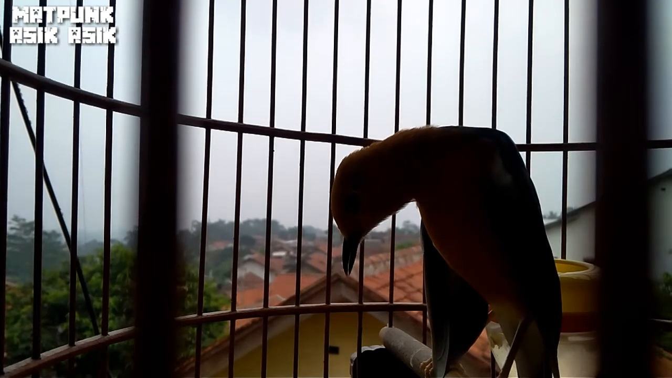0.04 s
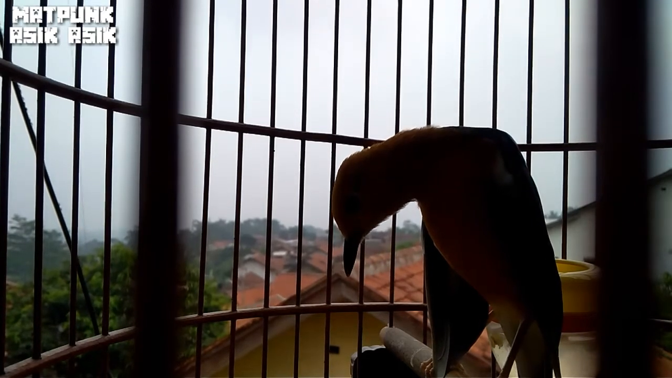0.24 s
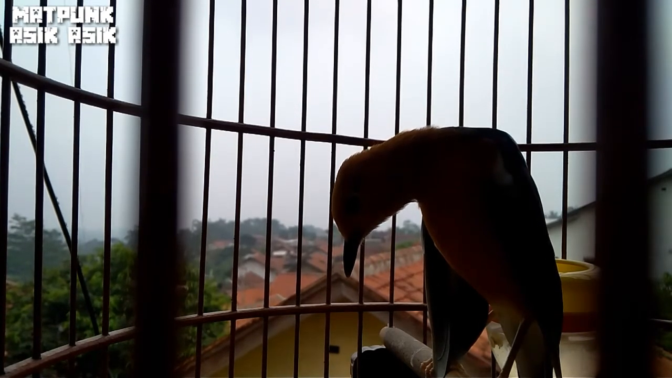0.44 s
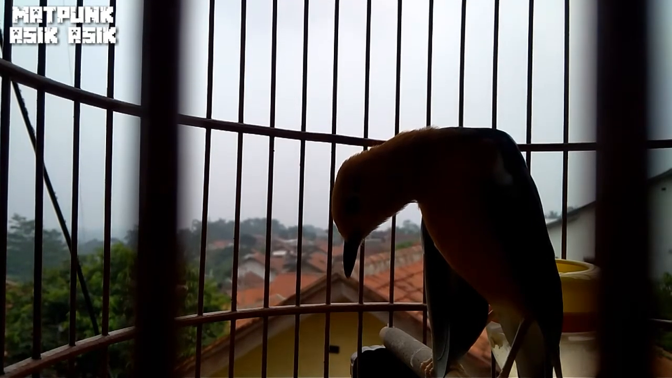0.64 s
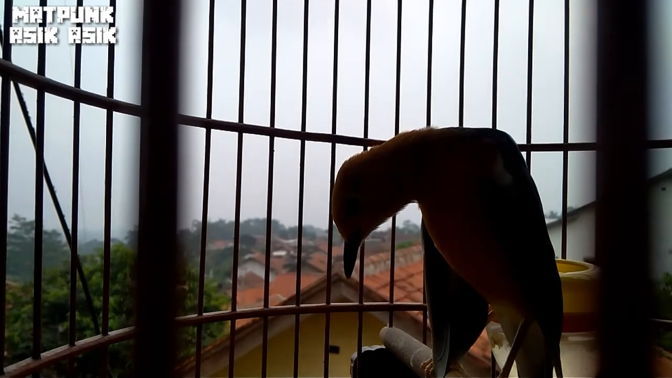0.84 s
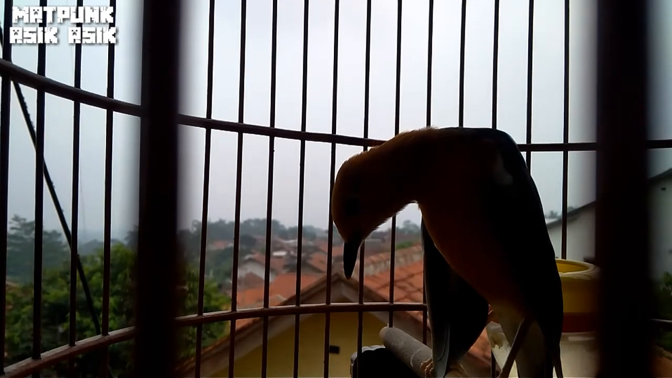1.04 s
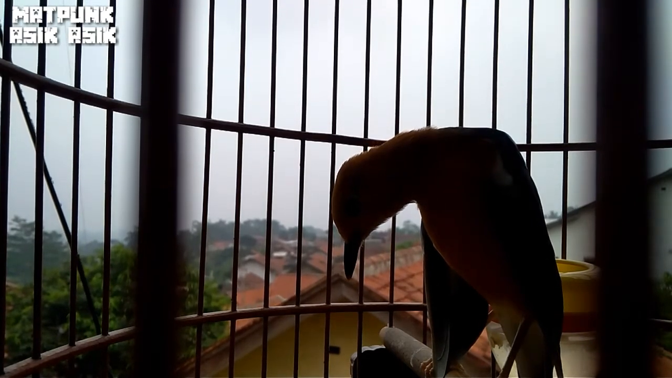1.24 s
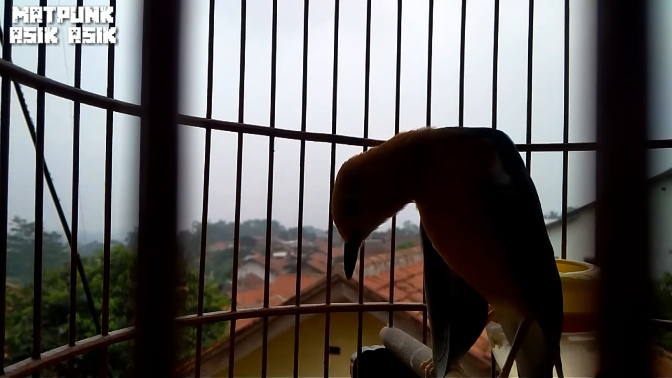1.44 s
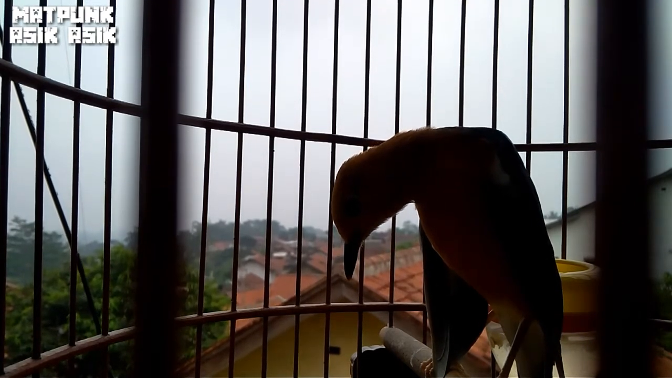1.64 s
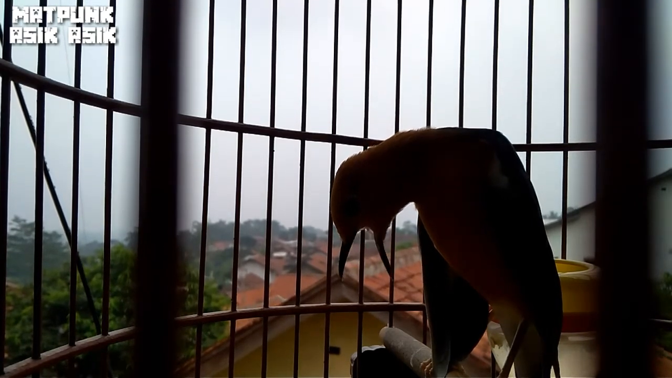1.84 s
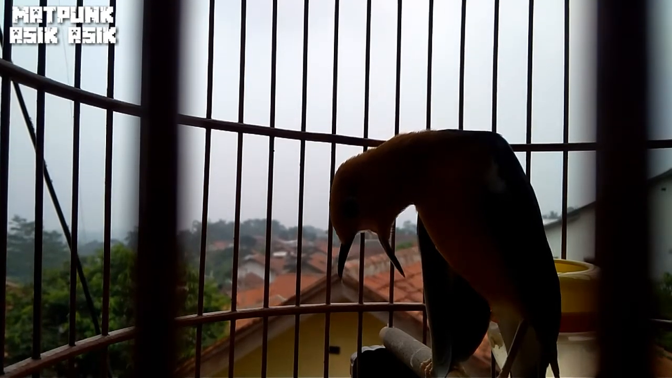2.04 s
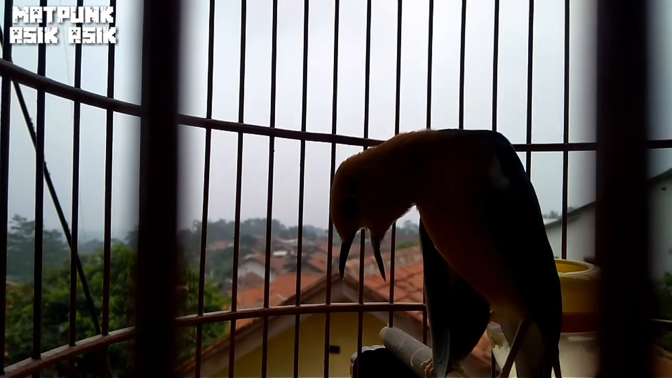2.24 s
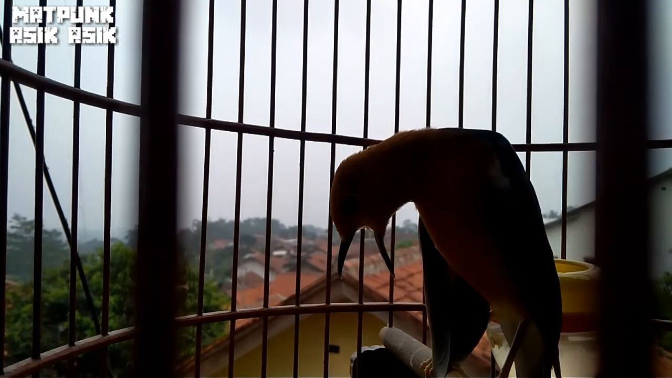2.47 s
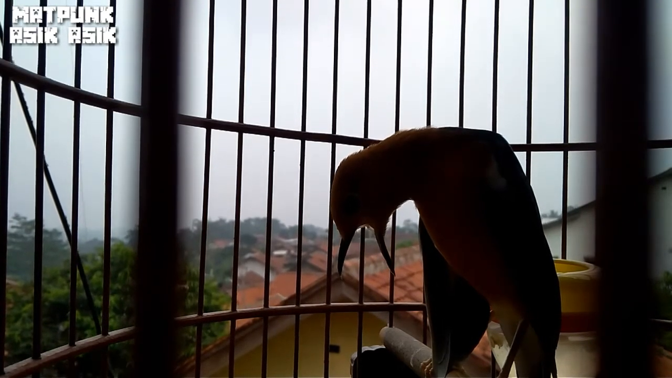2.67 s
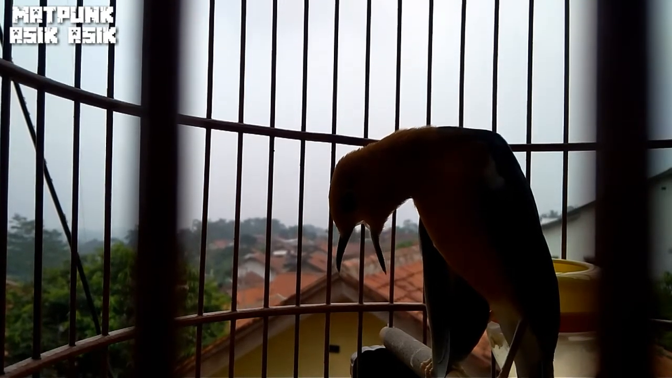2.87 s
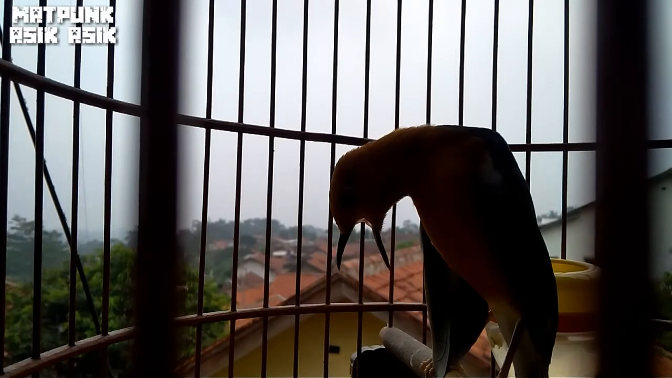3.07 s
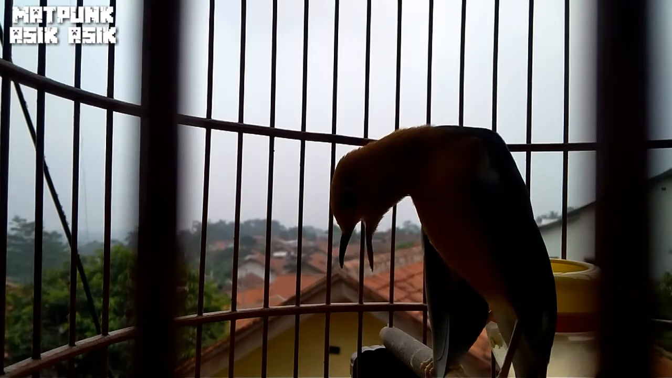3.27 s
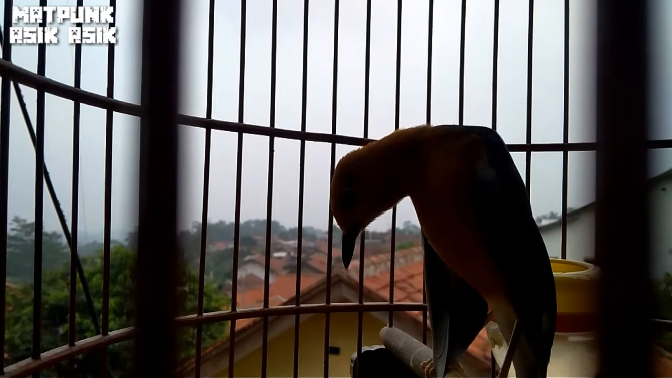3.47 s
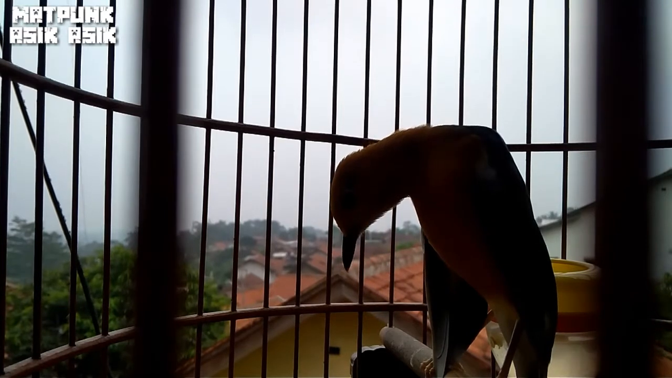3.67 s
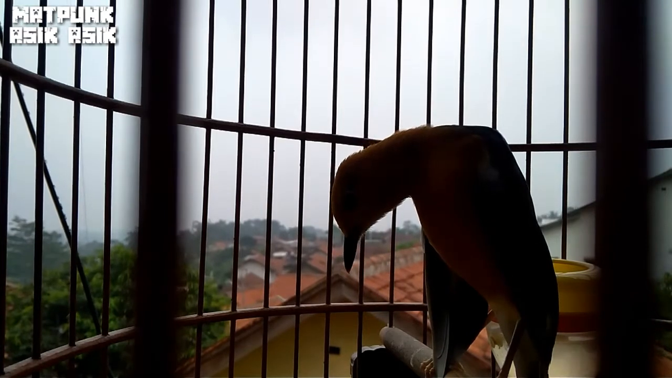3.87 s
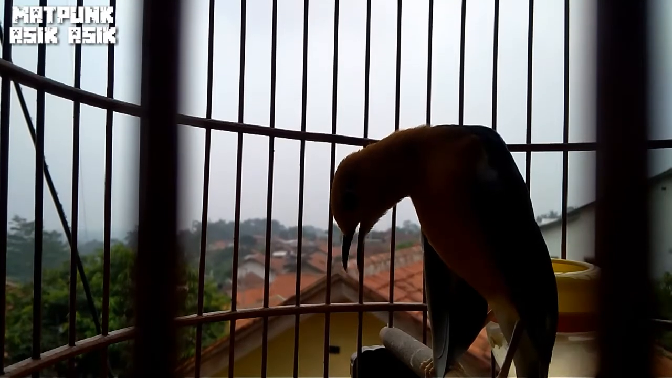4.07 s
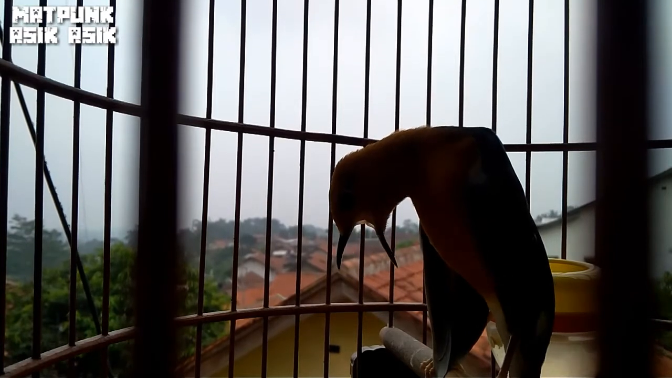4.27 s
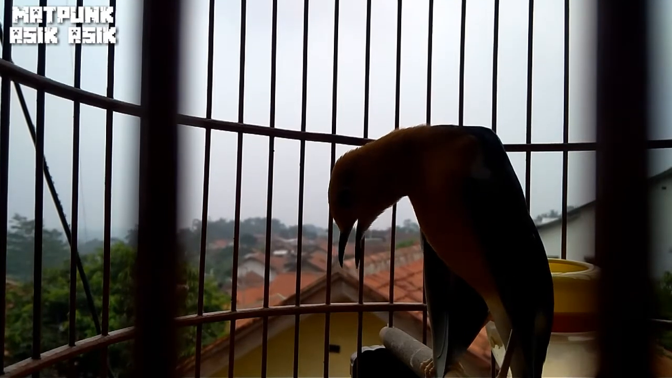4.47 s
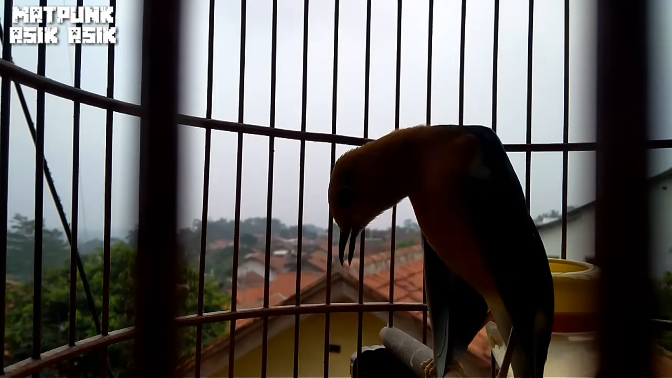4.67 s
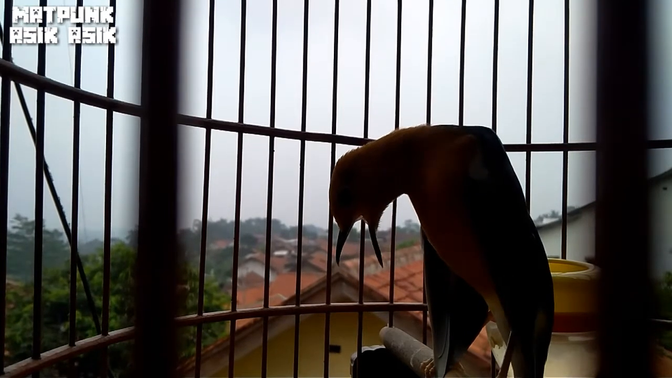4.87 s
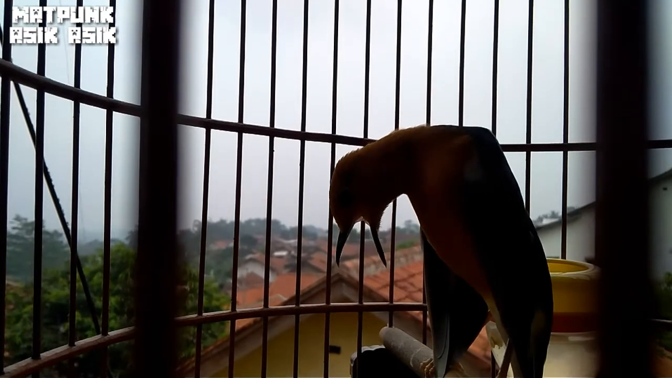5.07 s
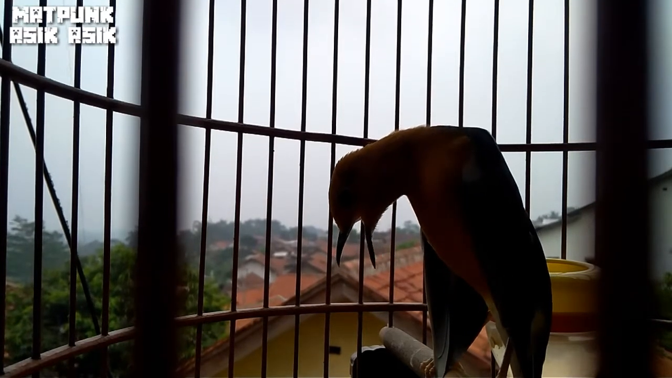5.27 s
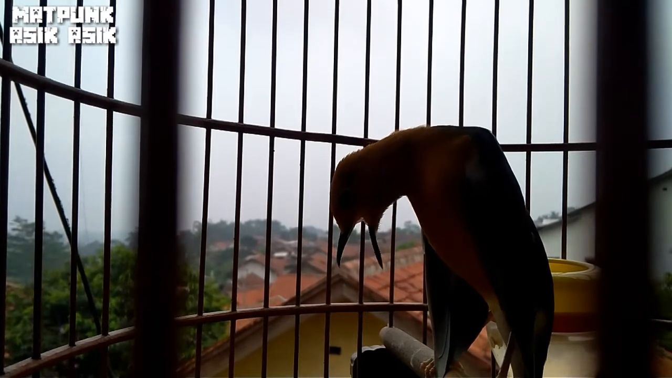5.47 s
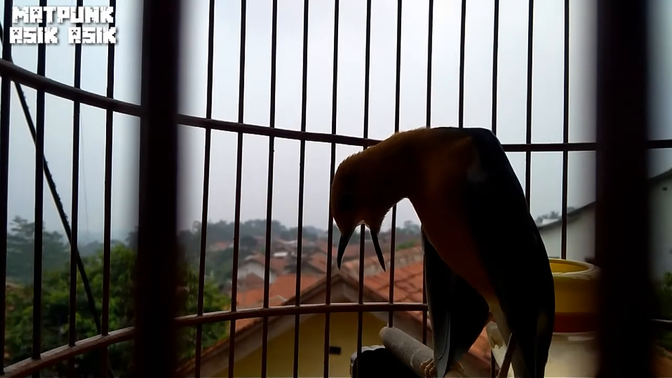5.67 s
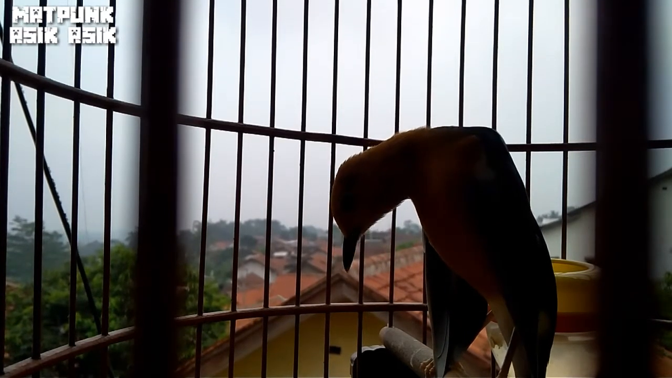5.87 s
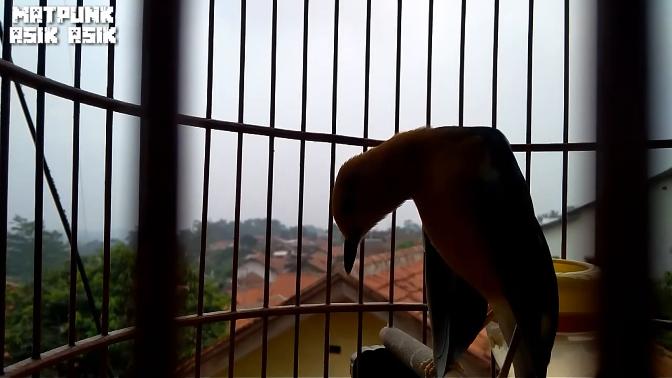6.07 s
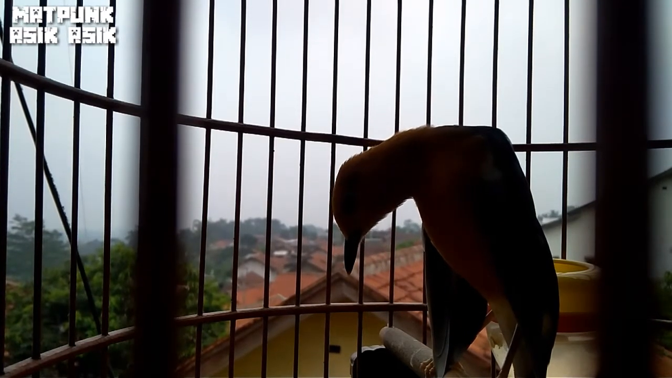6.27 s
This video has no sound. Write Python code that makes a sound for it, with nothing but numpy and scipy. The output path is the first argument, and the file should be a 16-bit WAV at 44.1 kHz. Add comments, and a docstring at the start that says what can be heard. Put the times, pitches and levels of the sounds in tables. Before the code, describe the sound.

A caged songbird very close to the microphone sings two sharp chirps, then twice a piercing two-toned whistle, harsh chack, falling trill and arched slur.

```python
"""On a roofed balcony a caged thrush sings very close to a phone, over wavering town noise and engine tones.
Its two-sided syrinx, as paired harmonic tones with air, gives chirps, then twice the same phrase: a long
two-voiced whistle, a harsh chack, a falling trill and an arched slur. Noise makes the breeze puffs and a knock,
warbling tones the far birds. Cage and balcony add short noise-like reflections; the loudest notes clip."""
import sys
import numpy as np
from scipy import signal
from scipy.fft import rfft, irfft, next_fast_len
from scipy.io import wavfile
from scipy.ndimage import uniform_filter1d, minimum_filter1d

SR = 44100
rng = np.random.default_rng(int(sys.argv[2]) if len(sys.argv) > 2 else 0)


def generate_wav(signal):
    """Clip the signal to [-1, 1] and save it as 16-bit WAV at the path in sys.argv[1]."""
    frames = np.transpose(np.atleast_2d(signal))
    scaled = np.clip(frames, -1, 1) * 32767
    pcm = np.round(scaled).astype(np.int16)
    wavfile.write(sys.argv[1], SR, pcm)


N = 278271
LEAD = SR // 4  # samples before time zero, when the song is already under way
T = np.arange(-LEAD, N) / SR  # s


def undb(db):
    """Decibels to gain."""
    return 10 ** (np.asarray(db) / 20)


def colour(x, points):
    """Shape a sound with a spectrum of (pitch_hz, level_db) points, joined along log frequency."""
    hz, db = np.transpose(points)
    size = next_fast_len(x.shape[-1])
    f = np.maximum(np.fft.rfftfreq(size, 1 / SR), 1)
    gain = undb(np.interp(np.log(f), np.log(hz), db))
    return irfft(rfft(x, size) * gain, size)[..., :x.shape[-1]]


def walk(t, rate):
    """Random wander through `rate` new values a second."""
    knots = np.arange(t[0], t[-1] + 1 / rate, 1 / rate)
    return np.interp(t, knots, rng.standard_normal(len(knots)))


def gate(t, edge):
    """Soft opening and closing of a note, each `edge` seconds long."""
    nearest_end = np.minimum(t - t[0], t[-1] - t)
    return np.sin(np.pi / 2 * np.clip(nearest_end / edge, 0, 1)) ** 2


def tone(hz, second_db, third_db):
    """A whistle with its second and third harmonics, which fade out far up in the treble."""
    phase = 2 * np.pi * np.cumsum(hz) / SR
    whistle = 0
    for k, db in enumerate((0, second_db, third_db), 1):
        treble_fade = np.clip((SR / 2 - k * hz) / (SR / 10), 0, 1)
        whistle = whistle + undb(db) * treble_fade * np.sin(k * phase)
    return whistle


def hiss():
    """Turbulent air in the throat, at unit level."""
    air = colour(rng.standard_normal(len(T)),
                 [(1500, -25), (3000, -30), (6000, 2.5), (9000, -1), (13000, -13), (16000, -22.5)])
    return air / air.std()


def echoes(x, t60, delay):
    """Dense reflections from `delay` s on that fall 60 dB in `t60` s, different at each microphone."""
    t = np.arange(SR) / SR
    response = rng.standard_normal((2, SR)) * np.exp(-np.log(1000) * t / t60) * (t > delay)
    response /= np.sqrt(np.sum(response ** 2, axis=1, keepdims=True))
    return signal.fftconvolve(x[None], response, axes=1)[:, :len(x)]


# Spectral shape of the hum before it is brought to unit level: pitch_hz, relative level_db
HUM_SPECTRUM = [(18, -48), (30, -7), (113, 1), (216, -5), (247, -6.5), (328, -10.5), (597, -22), (680, -22),
                (754, -27.5), (815, -18.5), (5880, -26), (10200, -28), (15000, -48.5)]
# Course of the hum, before the overall gain: time_s, relative level_db
HUM_LEVEL = [(0, -65), (.9, -69.5), (1.3, -61.5), (2.2, -62), (3.3, -59.5), (3.9, -65.5), (5, -63),
             (6.31, -57.5)]
# Engine tones, before their course and gain: mean pitch_hz, relative level_db
ENGINE_TONES = [(150.7, -72), (247.6, -70), (441.4, -74.5), (532.9, -78.5)]
# A far engine fades away early and gradually returns: time_s, relative level_db
ENGINE_LEVEL = [(0, 8), (.8, 1.5), (1.2, -12.5), (6.31, 2)]


def town(level_db=6, right_db=-7, flicker_db=2, drone_db=6, swell_db=2):
    """Distant traffic whose rumble and hiss waver apart, with engine tones; stronger at the left microphone."""
    hum = colour(rng.standard_normal((2, len(T))), HUM_SPECTRUM)
    hum = colour(hum / hum.std(), [(5000, 7), (10000, 4.5), (13000, -19.5)])
    rumble = colour(hum, [(250, 3.5), (900, -33)])
    traffic_hiss = hum - rumble
    hum = rumble * undb(flicker_db * walk(T, 30)) + traffic_hiss * undb(swell_db * walk(T, 5.9))
    hum = hum * undb(np.interp(T, *np.transpose(HUM_LEVEL)) + level_db)
    drone = np.zeros(len(T))
    for hz, db in ENGINE_TONES:
        loudness = undb(db + 2 * walk(T, 4.3))
        wandering_hz = hz * (1 + 0.036 * walk(T, 6.3))
        drone += loudness * np.sin(2 * np.pi * np.cumsum(wandering_hz) / SR)
    drone = drone * undb(np.interp(T, *np.transpose(ENGINE_LEVEL)) + drone_db)
    return (hum + drone) * undb([[0], [right_db]])


# Puffs of moving air at the left microphone: peak time_s, spread_s to either side, level_db
BREEZE_PUFFS = [(.68, 0.064, -45), (1.57, 0.023, -64), (3.501, 0.062, -39), (3.898, 0.099, -45),
                (5.975, 0.029, -64)]


def breeze(right_db=-12):
    """Soft low thumps of moving air, unrelated at the two microphones."""
    air = colour(rng.standard_normal((2, len(T))),
                 [(20, -17), (55, -2), (100, -4), (200, -31.5), (1000, -56)])
    swell = sum(undb(db) * np.exp(-((T - s) / spread) ** 2) for s, spread, db in BREEZE_PUFFS)
    return air / air.std() * swell * undb([[0], [right_db]])


# A light knock on the cage, heard at the left microphone: start_s, level_db
CAGE_KNOCKS = [(0.614, -51)]


def knocks(decay=0.053, right_db=-7):
    """A dry wooden tap: coloured noise that starts at once and dies exponentially."""
    wood = colour(rng.standard_normal((2, len(T))),
                  [(300, 1), (1200, 5), (3000, -7.5), (5500, -6), (8000, -25)])
    blows = sum(undb(db) * (T > s) * np.exp(-np.abs(T - s) / decay) for s, db in CAGE_KNOCKS)
    return wood / wood.std() * blows * undb([[0], [right_db]])


def notes(table, crest=0.21, warble_hz=185, scoop_db=-7, fade_db=-4, jitter=0.011, throb_hz=60,
          air_db=-36, snap_db=-34, breathy=0.057, edge=0.0042):
    """Short notes that glide to a crest and on with a fast warble; air snaps as each opens and shuts."""
    out, air = np.zeros(len(T)), hiss()
    for s, length, start_hz, crest_hz, end_hz, db, second_db, third_db, warble in table:
        on = (T >= s) & (T <= s + length)
        t = T[on] - s
        swing = warble * np.sin(2 * np.pi * warble_hz * t + .5 * walk(t, 100))  # Hz
        glide = np.interp(t / length, [0, crest, 1], [start_hz, crest_hz, end_hz])
        hz = glide * (1 + jitter * walk(t, 1300)) + swing
        # loudness throbs with the warble, one dB for each throb_hz of swing
        contour_db = np.interp(t / length, [0, crest, .5, 1], [scoop_db, 0, 0, fade_db])
        effort_db = db + contour_db + swing / throb_hz
        # air follows only a part of the note's level, so soft notes hold a larger share of it
        snap = undb(snap_db) * (1 - gate(t, 2 * edge))
        rush = (undb(air_db) + snap) * undb(breathy * db) * air[on]
        out[on] += gate(t, edge) * undb(effort_db) * tone(hz, second_db, third_db) + rush
    return out


# Far birds' calls: start_s, length_s, start_hz, crest_hz, end_hz, relative level_db
DISTANT_CALLS = [(1.013, 0.2, 2993, 3280, 3290, -62.5), (1.105, .15, 7275, 8280, 8050, -53.5),
                 (1.11, 0.13, 5710, 6140, 5970, -57.5), (1.324, 0.34, 3900, 3760, 3640, -62.5),
                 (1.621, 0.088, 2650, 3350, 2892, -46.5), (3.87, 0.13, 5785, 6330, 7190, -57),
                 (4.138, 0.28, 808, 782, 750, -54), (5.825, .085, 3420, 3270, 2580, -38.5),
                 (6.07, .16, 3720, 4684, 3135, -39)]


def far_birds(direct_db=-3, right_db=-6, second_db=-28, third_db=-43, warble_share=0.041):
    """Nearly pure far notes that warble by a fixed share of their pitch, blurred by long reflections."""
    table = [(s, length, start_hz, crest_hz, end_hz, db, second_db, third_db, warble_share * crest_hz)
             for s, length, start_hz, crest_hz, end_hz, db in DISTANT_CALLS]
    calls = notes(table, crest=0.29, warble_hz=70.1, scoop_db=-1, fade_db=-0.5, jitter=.012,
                  throb_hz=203, air_db=-29, snap_db=-41.5, breathy=0.71, edge=0.013)
    heard = undb(direct_db) * calls + echoes(calls, 0.59, 0.001436)
    return heard * undb([[0], [right_db]])


def sung(shape, events):
    """One gesture for each time a syllable is sung, stretched, transposed and louder or softer."""
    t, hz, db, octave_db, rasp = np.transpose(shape)
    return [np.column_stack([s + stretch * t, pitch * hz, db + level_db, octave_db, rasp])
            for s, stretch, pitch, level_db in events]


def syrinx(gestures, flutter_hz=165, flutter=.08, jitter=0.082, shimmer_db=5.5, third_db=-19,
           edge_db=12, air_db=-11, waver=.004):
    """One side of the syrinx; rasp shakes pitch and loudness, brightens the tone and adds rushing air."""
    out, air = np.zeros(len(T)), hiss()
    for gesture in gestures:
        s, *columns = np.transpose(gesture)
        on = (T >= s[0]) & (T <= s[-1])
        t = T[on]
        hz, db, octave_db, rasp = (np.interp(t, s, c) for c in columns)
        shake = flutter * np.sin(2 * np.pi * flutter_hz * t) + jitter * walk(t, 1800)
        hz = hz * (1 + waver * walk(t, 70) + rasp * shake)
        whistle = tone(hz, octave_db, octave_db + third_db + edge_db * rasp)
        rush = undb(air_db) * rasp * np.hypot(1, undb(octave_db)) * air[on]
        loudness = undb(db + shimmer_db * rasp * walk(t, 2500))
        out[on] += gate(t, 0.0014) * loudness * (whistle + rush)
    return out


# A slur's voice at onset, mid-rise, crest, end of hold, mid-fall, trough and end, before each slur's own
# levels: relative level_db, relative octave_db, rasp (0-1)
SLUR_STAGES = [(-27, 10, 0.9), (2, -21.5, 0.5), (2, -24.5, .17), (9, -21, 0), (6.5, -22.5, .24),
               (0.5, -1.5, 0), (-2.5, -4, 0.05)]


def slur(s, hold, fall, tail, trough_hz, end_hz, arch_db, tail_db, tail_octave_db,
         start_hz=2998, crest_hz=8680, rise=.017, fall_power=1.7, release=0.024, release_db=-8.5):
    """A gesture that shoots up to a crest, holds, falls ever more slowly and ends in a clean tail."""
    stages = s + np.cumsum([0, rise / 2, rise / 2, hold, fall / 2, fall / 2, tail])
    onset, _, crest, turn, mid_fall, trough, end = stages
    t = T[(T >= onset) & (T <= end)]
    arch_hz = np.interp(t, [onset, crest], [start_hz, crest_hz])
    tail_hz = np.interp(t, [trough, end], [trough_hz, end_hz])
    hz = tail_hz + (arch_hz - tail_hz) * np.interp(t, [turn, trough], [1, 0]) ** fall_power
    db, octave_db, rasp = (np.interp(t, stages, c) for c in np.transpose(SLUR_STAGES))
    settled = np.interp(t, [mid_fall, trough], [0, 1])  # 0 in the arch, 1 in the tail
    db = db + (1 - settled) * arch_db + settled * tail_db
    db = db + np.interp(t, [end - release, end], [0, release_db])
    return np.column_stack([t, hz, db, octave_db + settled * tail_octave_db, rasp])


# High trill notes rise and warble; low ones droop, smooth and rich in harmonics:
# crest_hz, start / crest ratio, end / crest ratio, second_db, third_db, warble depth_hz
TRILL_VOICE = [(4915, .94, .9, 1, -5.5, 45), (5535, .91, .935, -13.5, -12, 91),
               (5890, .86, .95, -13, -34, 205), (6170, .8, 1.03, -24, -35, 255),
               (6310, 0.99, 1.06, -19.5, -34, 310)]


def trill_note(s, length, crest_hz, db):
    """A trill note's pitch sets its slide, harmonics and warble."""
    register_hz, *columns = np.transpose(TRILL_VOICE)
    start, end, second_db, third_db, warble = (np.interp(crest_hz, register_hz, c) for c in columns)
    return s, length, start * crest_hz, crest_hz, end * crest_hz, db, second_db, third_db, warble


# Syllable shapes, one for each kind and side of the syrinx, before each singing's stretch, pitch and level:
# time_s into the syllable, pitch_hz, relative level_db, octave_db against the fundamental, rasp (0-1)
CHIRP_LOW = [(0, 2875, -10, 5, 0.43), (.009, 3188, -10, 6, 0.36), (.026, 3924, -12, 13.5, 0.27),
             (.047, 4847, -9, -1.5, 0.42), (.059, 4963, -3, -4, 0.1), (.075, 5010, -13.5, -2, .5)]
CHIRP_HIGH = [(.014, 4966, -2.5, -28.5, 0.23), (.028, 5623, 2, -19.5, 0.18), (.05, 6710, 2, -17.5, 0.28),
              (.076, 6700, -1, -15.5, .14)]
WHISTLE_LOW = [(0, 2840, -30.5, 8.5, .2), (.015, 3306, -3.5, 6, .27), (.03, 3735, 6, 13.5, .13),
               (.052, 4028, -6, 15, .04), (.1, 4002, -6, 13, 0.024), (.14, 4097, -4, 0, 0.09),
               (.225, 4440, -1.5, -4, 0.045), (.3, 4540, -2.5, 1.5, .06), (.32, 4410, -16, 6.5, .2)]
WHISTLE_HIGH = [(.004, 4264, -32, 2, .2), (.023, 5154, 13, -10, .19), (.04, 5770, -15.5, -19, .4),
                (.115, 6126, -12.5, -8.5, 1), (.187, 5955, -14, -7, .16), (.228, 6204, -3.5, -10.5, .15),
                (.308, 6200, 3, -14.5, 0.13), (.318, 6820, -15.5, -27.5, 0.097)]
CHACK_SHAPE = [(0, 2505, -24, -0.5, 0.75), (.008, 3492, -7.5, 8.5, .5), (.011, 5035, 8, -10.5, .32),
               (.019, 5190, -5, -11.5, 0.35), (.029, 4472, 8, -4, .75), (.048, 3830, -8.5, 1, .9),
               (.07, 3417, -3, -6, .7), (.083, 3020, -3, -12.5, 0.42)]
FLICK_SHAPE = [(0, 7545, -10, -28, .05), (.004, 6987, 3, -25, 0.073), (.011, 5600, 1, -11, .05)]  # a downward flick opens each trill
# When each syllable is sung: start_s, stretch ratio, pitch ratio, added level_db
CHIRP_TIMES = [(-.082, 0.81, 0.96, 0), (.028, 1.0, 1.0, 2)]
WHISTLE_TIMES = [(1.913, .953, .999, 0), (4.233, 1.053, 1.002, 0)]
CHACK_TIMES = [(2.328, 0.98, 1.0, 0.0037), (4.691, 1, 1.003, 0)]
FLICK_TIMES = [(2.506, 0.82, 1.0, 0), (4.91, 0.82, 1.0, 0.0046)]
# Arched slurs: start_s, hold_s, fall_s, tail_s, trough_hz, end_hz,
# added arch level_db, added tail level_db, added tail octave_db
SLUR_TIMES = [(3.201, .03, 0.07, .07, 5817, 5816, 4.5, -5, -7),
              (5.609, .045, .081, 0.1, 5212, 5890, -1, 0.5, -20)]
# Trill notes, about 14 a second and sinking in pitch: start_s, length_s, crest_hz, relative level_db
TRILL_NOTES = [(2.511, 0.031, 6417, 2.5), (2.572, 0.043, 6250, 1.5), (2.636, .044, 6110, 5),
               (2.702, 0.042, 6000, 2.5), (2.776, .038, 5898, 0.5), (2.849, .038, 5502, 2),
               (2.914, 0.053, 4750, -15.5), (2.985, 0.06, 4637, -15.5), (4.918, .032, 6520, -0.5),
               (4.978, .042, 6325, 1.5), (5.043, 0.057, 6195, 0), (5.108, .046, 6086, 3.5),
               (5.184, .042, 5758, -2.5), (5.252, .033, 5433, -1), (5.325, 0.043, 4734, -10),
               (5.408, .053, 4603, -19)]


def thrush(coupling_db=-26):
    """Both sides of the syrinx sing at once and modulate each other."""
    low_gestures = sung(CHIRP_LOW, CHIRP_TIMES) + sung(WHISTLE_LOW, WHISTLE_TIMES)
    low_gestures += sung(CHACK_SHAPE, CHACK_TIMES) + [slur(*row) for row in SLUR_TIMES]
    high_gestures = sung(CHIRP_HIGH, CHIRP_TIMES) + sung(WHISTLE_HIGH, WHISTLE_TIMES)
    high_gestures += sung(FLICK_SHAPE, FLICK_TIMES)
    low, high = syrinx(low_gestures), syrinx(high_gestures)
    trill = notes([trill_note(*row) for row in TRILL_NOTES])
    song = low + high + undb(coupling_db) * low * high + trill
    # the small throat and beak radiate little bass
    return colour(song, [(300, -15), (1800, -6.5), (3000, -1.5), (12500, 3), (16000, -3)])


# Tone of the near song at the right microphone, before its overall gain: pitch_hz, relative level_db
RIGHT_MICROPHONE = [(1000, -12.5), (3000, -7.5), (4500, -7.5), (6200, -13.5), (8000, -6), (9500, -1),
                    (13000, 3), (15500, -14)]


def near_song(cage_db=-12, cage_right_db=-6, balcony_db=-15, balcony_right_db=-11, right_db=-2):
    """The close song at both microphones, with quick cage reflections and the balcony's ring."""
    song = thrush()
    direct = np.array([np.roll(song, 4), song])  # reaches the left microphone 4 samples later
    # the right microphone is shaded by the phone, so reflections count for more there
    cage = undb([[cage_db], [cage_right_db]]) * echoes(song, 0.09, 0.00047)
    balcony = undb([[balcony_db], [balcony_right_db]]) * echoes(song, 0.27, 0.015)
    left, right = direct + cage + balcony
    return np.array([left, undb(right_db) * colour(right, RIGHT_MICROPHONE)])


def scene():
    """Town, breeze, knock and far birds behind the near song, from time zero on."""
    return (town() + breeze() + knocks() + far_birds() + near_song())[:, LEAD:]


def record(dry, ceiling=1.67, hold=0.0012, rail=0.97, top_hz=15600):
    """A fast limiter turns both channels down together; what is left over clips, then the top is cut."""
    size = max(int(hold * SR), 1)
    peak = np.abs(dry).max(axis=0)
    gain = minimum_filter1d(ceiling / np.maximum(peak, ceiling), size)
    gain = uniform_filter1d(gain, size)
    clipped = np.clip(dry * gain, -rail, rail)
    return signal.sosfilt(signal.ellip(8, .2, 60, top_hz, fs=SR, output="sos"), clipped)


dry = scene()
out = record(dry)
generate_wav(out)
```